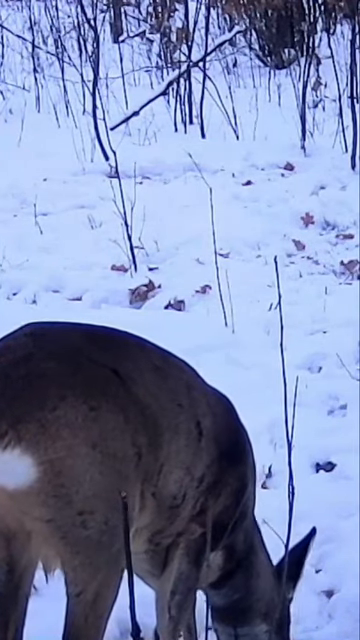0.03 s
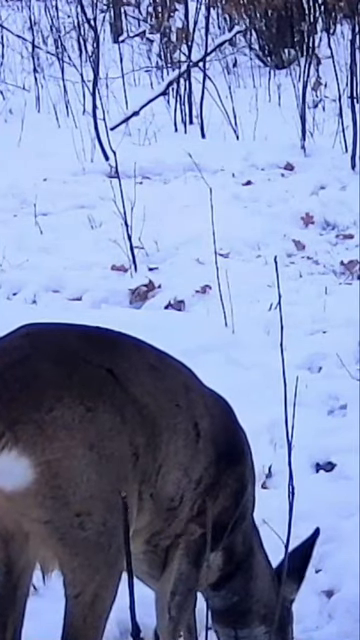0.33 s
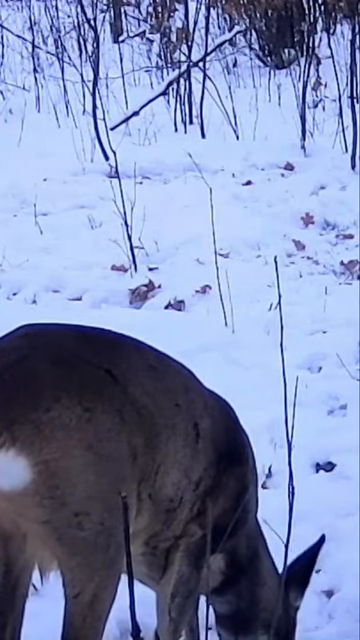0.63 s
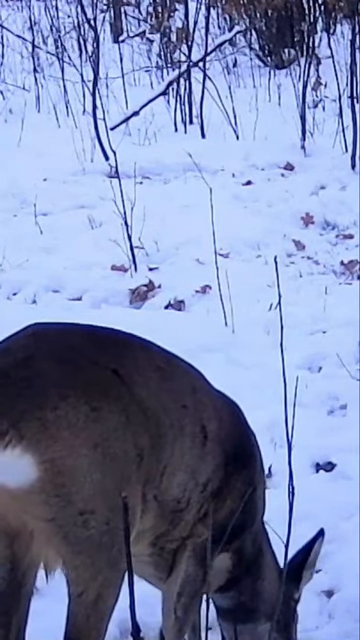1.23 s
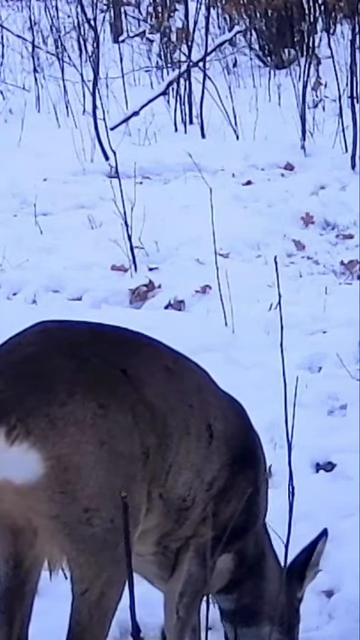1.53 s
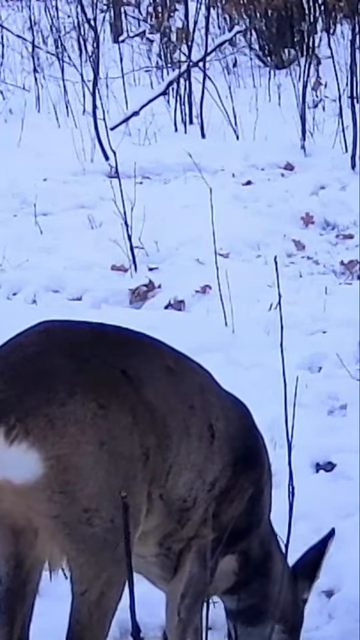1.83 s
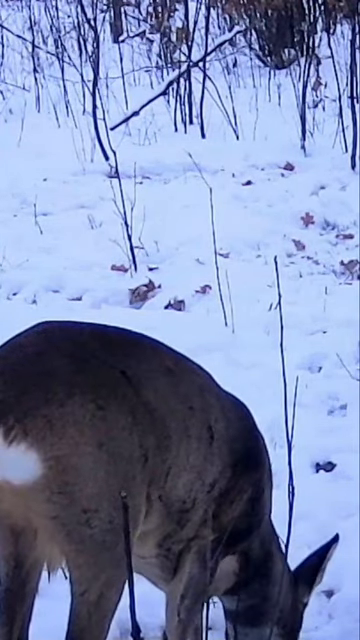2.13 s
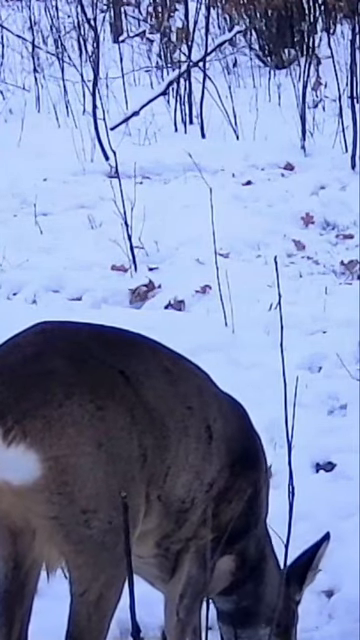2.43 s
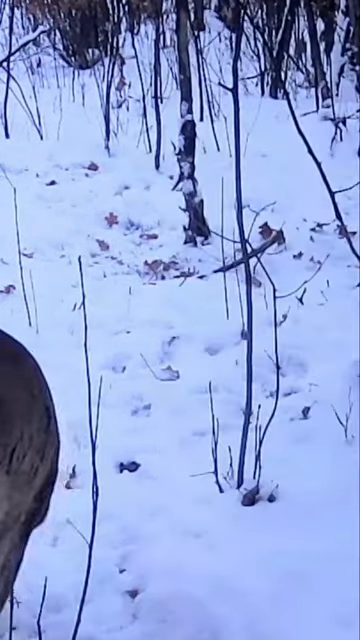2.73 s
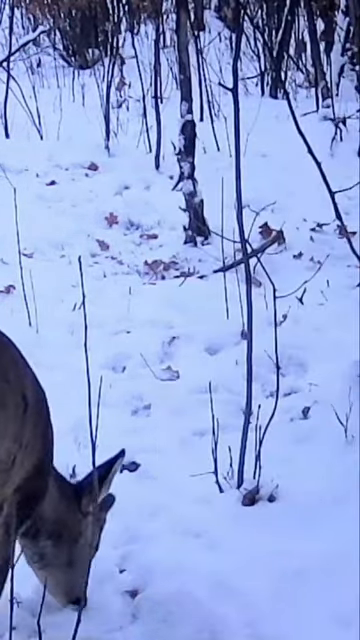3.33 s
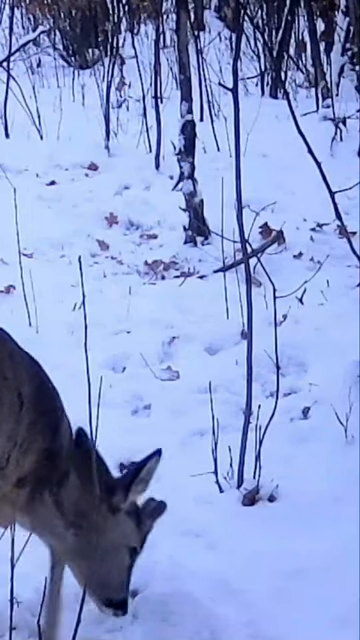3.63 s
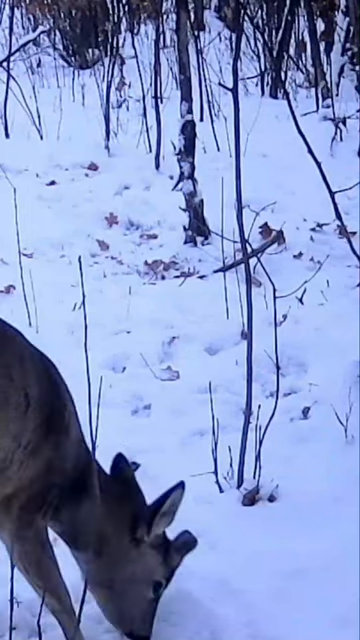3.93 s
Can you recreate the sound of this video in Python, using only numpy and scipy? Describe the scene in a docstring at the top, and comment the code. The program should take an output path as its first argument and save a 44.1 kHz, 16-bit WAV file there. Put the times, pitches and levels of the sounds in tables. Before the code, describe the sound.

Soft, creaky snow crunches come in quick bursts as a deer forages among crackling leaves and stems, growing sparser after a single sharp click. Behind it is a quiet wood, with gentle hiss and a slight wind rumble on the microphone.

```python
"""A deer's muzzle shoves through snow about three times a second, making it crunch and creak.
Dry leaves rustle under it, small stems snap and soft bumps sit below the movements.
Behind it is a quiet wood: soft hiss, a faint whine and light air on the microphone.
One sharp click cuts in a little past halfway."""
import sys
import numpy as np
from scipy import signal
from scipy.fft import rfft, irfft
from scipy.io import wavfile
from scipy.ndimage import uniform_filter1d

SR = 44100
rng = np.random.default_rng(int(sys.argv[2]) if len(sys.argv) > 2 else 0)


def persist_wave(psi):
    """Save psi, clipped to +-1, as 16-bit WAV."""
    counts = np.round(np.clip(psi, -1, 1) * 32767).astype(np.int16)
    wavfile.write(sys.argv[1], SR, np.atleast_2d(counts).T)


N = 176400

SNOW_GRAINS_PER_S, SNOW_SPREAD_DB = 7000, 2.6
# Tone of the crunch: f/Hz, relative level/dB
SNOW_EQ = [(150, 13), (500, -4), (900, -8.5), (1400, -2), (2900, -1), (4000, 0), (6500, -5), (9500, -13.5),
           (12000, -17.5), (15000, -41)]
# Muzzle shoves: peak t/s, rise/s, fall/s, level/dB
SHOVES = [(.445, 0.04, 0.03, -60.5), (.80, 0.041, 0.028, -57.5), (1.113, 0.042, .036, -55),
          (1.481, .01, 0.0043, -52.5), (1.49, .045, 0.032, -58), (1.852, 0.012, 0.0087, -58),
          (1.887, 0.02, 0.032, -54), (1.95, 0.022, 0.034, -57), (2.36, 0.025, 0.04, -57),
          (2.535, 0.021, .035, -59), (3.52, 0.062, 0.023, -58), (3.526, .004, .003, -56),
          (3.77, 0.046, .06, -68), (3.995, 0.037, .04, -54.5)]
def snow_crunch(t):
    """Snow crystals break in small clumps as the muzzle shoves."""
    crystals = colour(grains(SNOW_GRAINS_PER_S, SNOW_SPREAD_DB), SNOW_EQ)
    clumps = undb(1.4 * drift(rate_hz=120))
    return crystals * clumps * swells(SHOVES, t)


# Hollow creaks of packing snow: peak t/s, rise/s, fall/s, level/dB, f/Hz
CREAKS = [(.45, .035, 0.026, -69, 1740), (.795, 0.027, .02, -61.5, 1660),
          (1.115, 0.017, 0.025, -62.5, 1930), (1.472, 0.023, 0.011, -59.5, 1660),
          (1.484, 0.0046, 0.0098, -59, 1360), (1.852, .012, .04, -69, 1850),
          (2.35, 0.028, 0.018, -62, 1575), (3.98, 0.01, 0.024, -58, 1720)]
def snow_creaks(t):
    """Packed snow sticks and slips unevenly; each slip rings at its own pitch over a narrow scrape."""
    slips_per_s, jitter, spread_db = 110, .35, 2.5
    ring_s, pitch_scatter, scrape_db = .0017, .11, -3.5
    gap, size, detune = rng.standard_normal((int(2 * slips_per_s * N / SR), 3)).T
    starts = np.append(0, np.cumsum(np.exp(jitter * gap)) / slips_per_s)
    slip = np.searchsorted(starts, t, side="right") - 1  # the latest slip at each moment
    age = t - starts[slip]
    decay = undb(spread_db * size[slip]) * np.exp(-age / ring_s)
    grit = grains(SNOW_GRAINS_PER_S, SNOW_SPREAD_DB)
    out = np.zeros(N)
    for *swell, hz in CREAKS:
        slip_hz = hz * np.exp(pitch_scatter * detune[slip])
        ring = unit(decay * np.sin(2 * np.pi * slip_hz * age))
        scrape = undb(scrape_db) * band(grit, [hz / np.sqrt(2), hz * np.sqrt(2)])
        out += unit(ring + scrape) * swells([swell], t)
    return out


# Tone of the dry leaves: f/Hz, relative level/dB
LEAF_EQ = [(500, -47), (2000, -8.5), (3500, -2), (6500, 3.5), (8000, -1.5), (9700, -3), (12000, -21),
           (15000, -45)]
# Leaf rustles: peak t/s, rise/s, fall/s, level/dB
RUSTLES = [(.434, 0.0078, 0.034, -59), (.598, 0.003, 0.037, -63), (.66, .011, 0.024, -59.5),
           (.80, 0.016, 0.036, -55), (1.135, 0.068, 0.023, -61.5), (1.29, 0.04, 0.07, -64),
           (1.515, 0.037, .013, -57), (1.648, 0.069, 0.046, -60.5), (1.895, 0.02, 0.046, -60.5),
           (1.957, 0.0063, 0.0043, -57), (1.981, 0.014, 0.0092, -57.5), (2.12, 0.18, 0.25, -68.5),
           (2.365, .0099, .034, -66.5), (2.47, 0.0055, 0.0064, -60.5), (2.53, 0.085, 0.037, -70.5),
           (3.765, 0.012, 0.048, -68.5), (3.92, 0.01, 0.014, -61.5), (3.967, 0.0025, .03, -62)]
def leaf_rustles(t):
    """Dry leaves crinkle, brighter and coarser than the snow."""
    crinkle = colour(grains(per_s=4000, spread_db=3.3), LEAF_EQ)
    clumps = undb(2.2 * drift(rate_hz=150))
    return crinkle * clumps * swells(RUSTLES, t)


# Tone of a stem's crack: f/Hz, relative level/dB
CRACK_EQ = [(500, -3), (1500, -4.5), (4000, 3), (7000, -15), (10000, -8.5), (12500, -7), (15000, -40)]
# Snapping stems and leaf ribs: t/s, level/dB, f/Hz
SNAPS = [(.431, -45, 5260), (0.595, -52.5, 6940), (1.095, -48, 2600), (1.11, -46.5, 3100),
         (1.197, -52, 3550), (1.237, -52.5, 7500), (1.35, -54.5, 4500), (1.384, -49, 6100),
         (1.476, -45, 2700), (1.482, -46, 3280), (1.56, -58, 6500), (1.628, -48, 5000), (1.787, -50, 7000),
         (1.837, -54, 3500), (1.851, -47, 3200), (1.882, -54, 2800), (1.9333, -45, 2000),
         (1.955, -51, 6470), (1.959, -51, 5370), (2.119, -55, 7500), (2.139, -44, 3540), (2.472, -51, 4000),
         (2.53, -44, 3770), (3.078, -49.5, 5660), (3.3343, -50.5, 2550), (3.337, -47.5, 5050),
         (3.5298, -39, 1980), (3.726, -50, 5500), (3.738, -55, 5800), (3.768, -48.5, 6000)]
def stem_snaps(t):
    """Each stem rings for a couple of cycles, with a splintering crack and a faint tail of crumbs."""
    decay_s, tail_s, tail_db = .0015, .0069, -23
    ring_cycles, ring_db, top_hz = 2, 3, 10800
    crack = undb(-1.5) * colour(rng.standard_normal(N), CRACK_EQ)
    out = np.zeros(N)
    for start, db, hz in SNAPS:
        age = np.maximum(t - start, 0)
        decay = (t >= start) * (np.exp(-age / decay_s) + undb(tail_db) * np.exp(-age / tail_s))
        splinters = band(rng.standard_normal(N), hz * np.exp([-.22, .22]))
        ring = undb(ring_db) * np.sin(2 * np.pi * hz * age) * np.exp(-hz * age / ring_cycles)
        out += undb(db) / 2 * (ring + decay * (splinters + crack))
    return signal.sosfilt(signal.butter(4, top_hz, fs=SR, output="sos"), out)


# Tone of the bumps: f/Hz, relative level/dB
BUMP_EQ = [(20, 5), (45, 13), (75, 3.5), (110, -15.5), (200, -19.5), (450, -18.5), (900, -63), (3000, -90)]
# Low bumps: peak t/s, rise/s, fall/s, level/dB
BUMPS = [(.165, 0.015, 0.0087, -45), (.595, 0.015, .024, -47), (.785, .014, 0.023, -52),
         (1.105, .028, .013, -51.5), (1.46, .0079, 0.024, -45.5), (3.545, 0.02, 0.031, -50.5)]
def soft_bumps(t):
    """Dull, soft bumps put weight under the movements."""
    return colour(rng.standard_normal(N), BUMP_EQ) * swells(BUMPS, t)


def click(t, start_s=2.606, level_db=-27.8, decay_s=.009):
    """One sharp click: an instant jump that settles back."""
    age = np.maximum(t - start_s, 0)
    return undb(level_db) * (t >= start_s) * np.exp(-age / decay_s)


# Tone of the hiss: f/Hz, relative level/dB
HISS_EQ = [(35, 12.5), (70, 18.5), (130, 5), (250, 1), (450, 0), (700, -1.5), (1100, -6.5), (2200, -9),
           (4000, -10.5), (6800, -14.5), (7800, -22), (9800, -20.5), (12500, -31.5), (15000, -47)]
def hiss(level_db=-57):
    """A soft, even bed of noise with a full low end."""
    return undb(level_db) * colour(rng.standard_normal(N), HISS_EQ)


def whine(centre_hz=702.3, waver_hz=3.16, level_db=-76):
    """A faint, thin tone wavers in pitch."""
    hz = centre_hz + waver_hz * drift(rate_hz=12)
    return undb(level_db) * unit(np.sin(2 * np.pi * np.cumsum(hz) / SR))


# Tone of the air rumble: f/Hz, relative level/dB
AIR_EQ = [(3, -15.5), (9, 5), (18, 2.5), (28, -13.5), (50, -13.5), (75, -39.5), (120, -51.5), (2000, -130)]
# Rise and fall of the air: t/s, level/dB
GUSTS = [(0, -44), (.72, -45.5), (.85, -42.5), (1.0, -46.5), (1.27, -36.5), (1.42, -42), (2.08, -49),
         (2.21, -31), (2.29, -32), (2.39, -43.5), (2.48, -33.5), (2.63, -26), (2.68, -39.5), (2.81, -45.5),
         (2.87, -30), (3.2, -36.5), (3.29, -35), (3.55, -43), (4, -37.5)]
def air_rumble(t):
    """Light gusts on the microphone make a sub-bass rumble."""
    gust_db = np.interp(t, *np.array(GUSTS).T)
    return undb(gust_db) * colour(rng.standard_normal(N), AIR_EQ)


def undb(db):
    """Decibels to gain."""
    return 10 ** (np.asarray(db) / 20)


def unit(x):
    """Scale to rms 1."""
    return x / np.sqrt(np.mean(x ** 2))


def colour(x, eq):
    """Shape with an EQ curve of f/Hz, level/dB points; rms 1."""
    hz, db = np.array(eq).T
    f = np.maximum(np.fft.rfftfreq(N, 1 / SR), 1)
    gain = undb(np.interp(np.log(f), np.log(hz), db))
    return unit(irfft(rfft(x - x.mean()) * gain, N))


def band(x, edges_hz):
    """Band-pass; rms 1."""
    return unit(signal.sosfilt(signal.butter(2, edges_hz, "band", fs=SR, output="sos"), x))


def drift(rate_hz):
    """Smooth random movement; rms 1."""
    hold = int(SR / rate_hz)
    steps = rng.standard_normal(N)[np.arange(N) // hold]
    return unit(uniform_filter1d(steps, hold))


def grains(per_s, spread_db):
    """Tiny fractures at random moments, many weak and a few strong."""
    size = undb(spread_db * np.minimum(rng.exponential(size=N), np.log(100)))
    return (rng.random(N) < per_s / SR) * size * np.sign(rng.standard_normal(N))


def swells(table, t, shape=1.42):
    """Envelope of movements that each swell and die away; shape 1 is pointed, 2 is rounded."""
    power = np.zeros(N)
    for peak, rise, fall, db in table:
        away = np.abs((t - peak) / np.where(t < peak, rise, fall))
        power += (undb(db) * np.exp(-away ** shape / 2)) ** 2
    return np.sqrt(power)


def scene():
    """The foraging deer over the quiet background, in mono."""
    t = np.arange(N) / SR
    deer = snow_crunch(t) + snow_creaks(t) + leaf_rustles(t) + stem_snaps(t) + soft_bumps(t)
    return (deer + click(t) + hiss() + whine() + air_rumble(t))[None]


def record(dry):
    """A small DC offset and a steep top cut; the lows and the offset fade at both ends."""
    offset, top_hz, low_hz, fade_s = -.0254, 15700, 100, .03
    t = np.arange(N) / SR
    from_end_s = np.minimum(t, t[::-1])
    fade = np.sin(np.pi / 2 * np.minimum(from_end_s / fade_s, 1)) ** 2
    lows = signal.sosfiltfilt(signal.butter(2, low_hz, fs=SR, output="sos"), dry) + offset
    top_cut = signal.ellip(8, .2, 70, top_hz, fs=SR, output="sos")
    return signal.sosfilt(top_cut, dry + offset - (1 - fade) * lows)


dry = scene()
out = record(dry)
persist_wave(out)
```